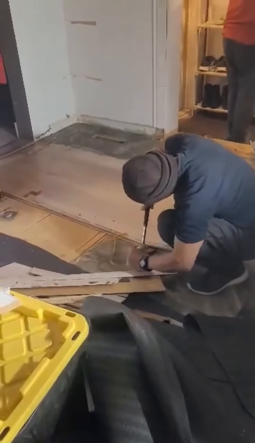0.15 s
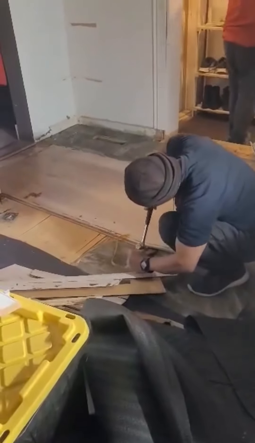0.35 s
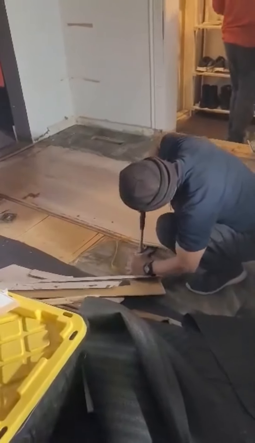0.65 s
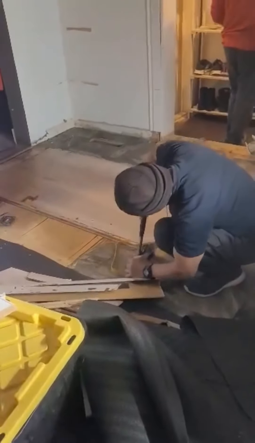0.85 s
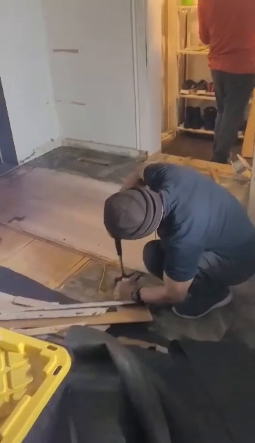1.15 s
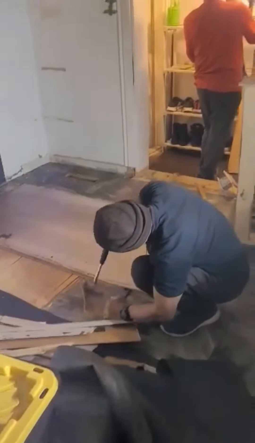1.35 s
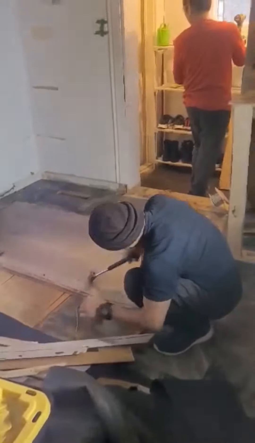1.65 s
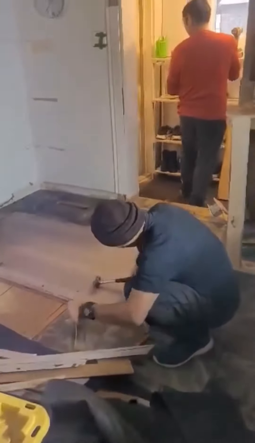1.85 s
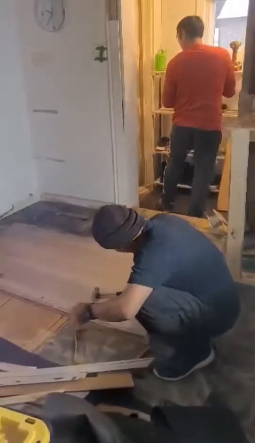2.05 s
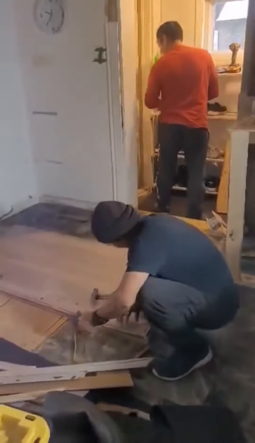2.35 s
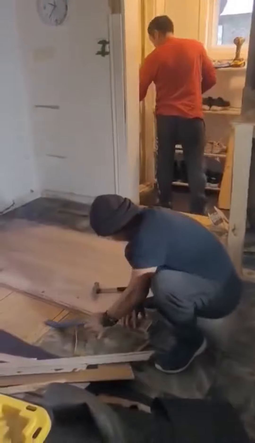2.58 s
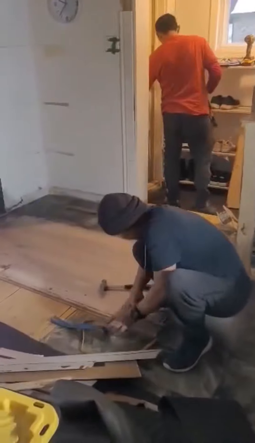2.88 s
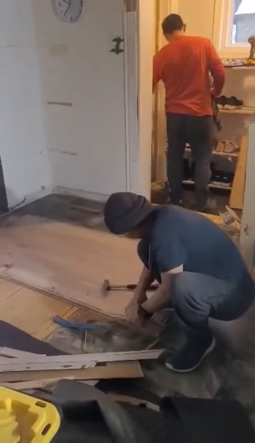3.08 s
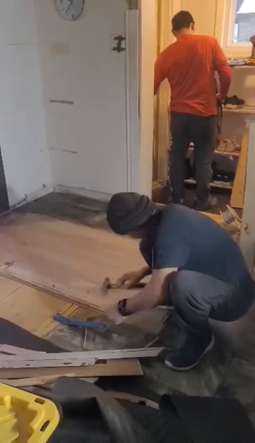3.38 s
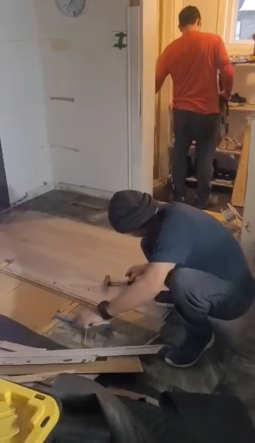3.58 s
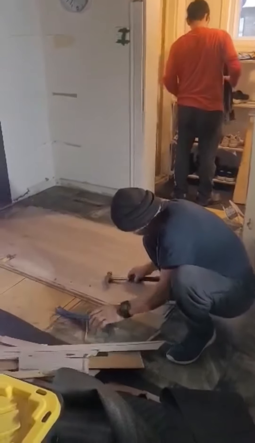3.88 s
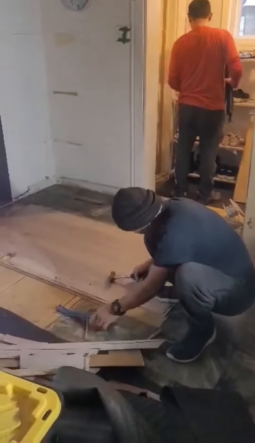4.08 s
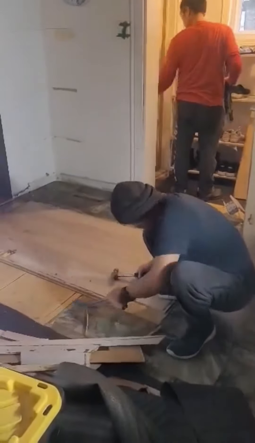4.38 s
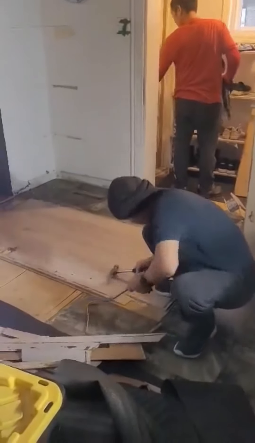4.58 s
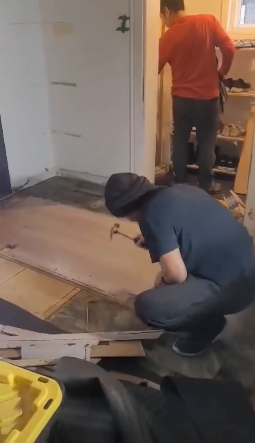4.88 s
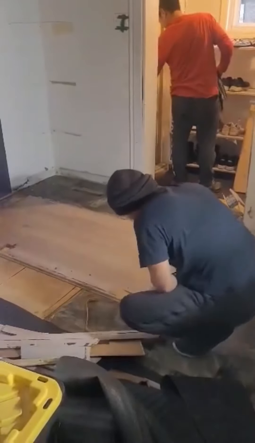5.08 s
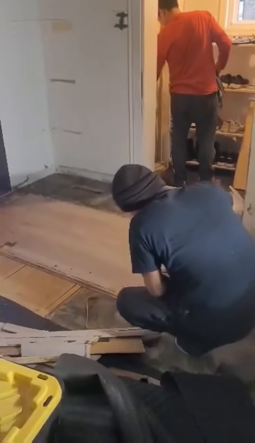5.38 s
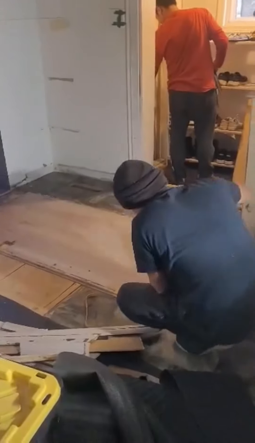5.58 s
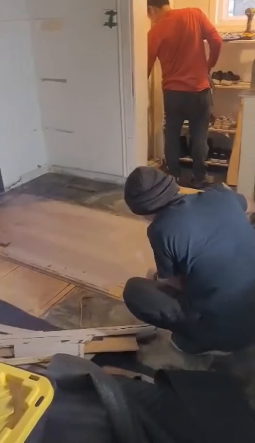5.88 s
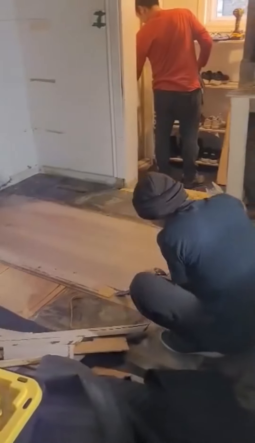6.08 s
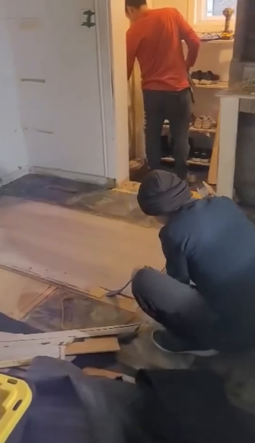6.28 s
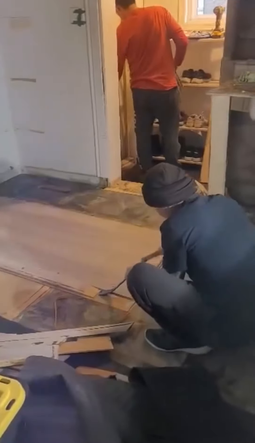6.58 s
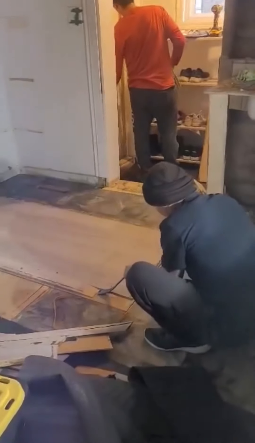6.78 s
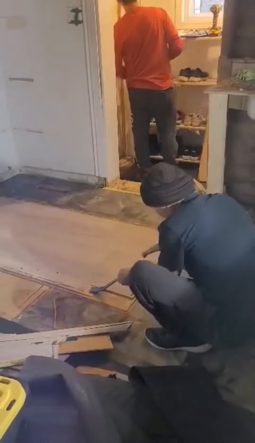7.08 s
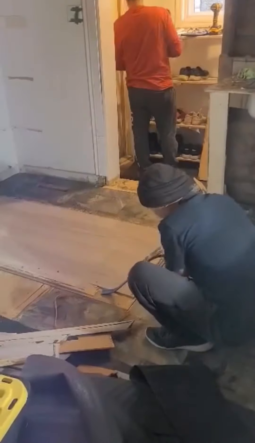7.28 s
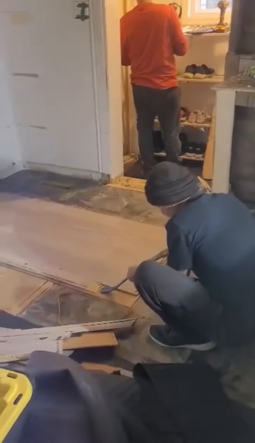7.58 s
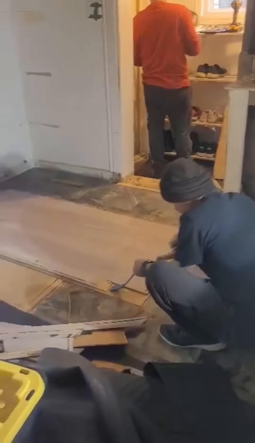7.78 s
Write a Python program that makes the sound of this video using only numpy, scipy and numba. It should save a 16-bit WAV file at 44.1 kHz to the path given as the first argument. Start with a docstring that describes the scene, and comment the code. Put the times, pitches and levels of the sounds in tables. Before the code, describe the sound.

A hammer knocks a steel pry bar on a wooden floor, with sharp clacks, dull thuds and gritty scrapes in a small room.

```python
"""A hammer knocks a steel pry bar on a half-stripped wooden floor, while the crouching worker drags tools
and boards about and shifts their weight. Hard contacts clack, a few blows ring the bar, soft ones thud
through the boards; grit scrapes under whatever slides, and one rub squeaks. A small bare room answers
over a faint house hush, heard by a phone whose right port is muffled in the treble."""
import sys
import numpy as np
from scipy import signal
from scipy.fft import rfft, irfft
from scipy.io import wavfile
from scipy.ndimage import uniform_filter1d
from numba import njit

SR = 44100
rng = np.random.default_rng(int(sys.argv[2]) if len(sys.argv) > 2 else 0)


def dump_mix(stems):
    """Bounce the given channels to the path in sys.argv[1] as a 16-bit WAV at rate SR."""
    frames = np.atleast_2d(stems).T  # one column per channel
    limited = np.clip(frames, -1, 1)  # hard clip at full scale
    pcm = np.round(limited * 32767).astype(np.int16)
    wavfile.write(sys.argv[1], SR, pcm)


N = 350154

# floorboard modes: (frequency [Hz], level [dB], t60 [s])
BOARD_MODES = [(172.3, -2.5, 0.13), (236, -11.5, 0.083), (272.5, -6.5, 0.1), (346.6, 11, 0.026),
               (407, 2, 0.021), (469.2, -0.5, 0.037), (605, -6.5, 0.21)]


def undb(db):
    return 10 ** (np.asarray(db) / 20)


def unit(x):
    return x / np.sqrt(np.mean(x ** 2))


def peak(x):
    return x / np.max(np.abs(x))


def band(x, lo_hz, hi_hz):
    """Band-pass between two edges."""
    sos = signal.butter(2, [lo_hz, min(hi_hz, .45 * SR)], "bandpass", fs=SR, output="sos")
    return signal.sosfilt(sos, x)


def colour(x, curve):
    """EQ through (frequency [Hz], gain [dB]) points."""
    hz, db = np.transpose(curve)
    f = np.maximum(np.fft.rfftfreq(N, 1 / SR), 1)
    return irfft(rfft(x) * undb(np.interp(np.log(f), np.log(hz), db)), N)


def stereo_noise(size, crossover_hz=520, bass_width=.16):
    """Two noises, nearly mono in the bass and wide in the treble."""
    mid, side, deep = rng.standard_normal((3, size))
    low = signal.butter(2, crossover_hz, fs=SR, output="sos")
    high = signal.butter(2, crossover_hz, "highpass", fs=SR, output="sos")
    return np.array([signal.sosfilt(low, mid + bass_width * deep) - signal.sosfilt(high, mid),
                     signal.sosfilt(low, mid - bass_width * deep) + signal.sosfilt(high, side)])


def wander(rate_hz):
    """Glides between random values; spread near 1."""
    hold = int(SR / rate_hz)
    return uniform_filter1d(np.repeat(rng.standard_normal(N // hold + 1), hold), hold)[:N]


def add(out, x, start_s):
    """Mixes x in from start_s."""
    i = round(start_s * SR)
    out[i:i + len(x)] += x[:N - i]


def ring(modes, t, scatter_db, detune):
    """Response of a struck body; every blow lands elsewhere, so mode strengths scatter."""
    hz, db, t60 = np.transpose(modes)[:, :, None]
    level_draw, pitch_draw = rng.standard_normal((2, len(modes), 1))
    decay = np.exp(-np.log(1000) * t / np.maximum(t60, .01))
    partials = np.sin(2 * np.pi * hz * (1 + detune * pitch_draw) * t)
    return np.sum(undb(db + scatter_db * level_draw) * decay * partials, axis=0)


def house_hush():
    """Room tone: low, wavering noise and a faint hum, growing quieter toward the end."""
    # hush spectrum: (frequency [Hz], relative level [dB])
    spectrum = [(18, -21), (30, -21.5), (141, -8), (165, -8), (362, -6.5), (455, -11), (795, -17),
                (974, -17.5), (1930, -25), (2250, -30.5), (13000, -47.5)]
    # narrow hum in the house: (centre [Hz], width [Hz], level [dB])
    hum_bands = [(773, 52, -65)]
    # fade of hush and hum: (time [s], gain [dB])
    fade = [(0, 0), (6.2, -1.5), (7.94, -6.5)]
    noise = stereo_noise(N)
    hum = sum(undb(db) * unit(band(noise, hz - w / 2, hz + w / 2)) for hz, w, db in hum_bands)
    hush = undb(-52.5 + 2 * wander(29)) * unit(colour(noise, spectrum))
    fade_db = np.interp(np.arange(N) / SR, *np.transpose(fade))
    return undb(fade_db) * (hush + hum)


def room_tail(build_s=.002):
    """Diffuse answer of the bare room to one spot: builds quickly, loses treble first."""
    # reverb decay: (frequency [Hz], t60 [s])
    decay_times = [(60, 0.38), (500, 0.31), (2000, 0.2), (4000, 0.19), (12000, 0.17)]
    t = np.arange(int(.45 * SR)) / SR
    noise = stereo_noise(len(t))
    hz, t60 = np.transpose(decay_times)
    octaves = 50 * 2. ** np.arange(9)
    octave_t60 = np.interp(np.log(octaves), np.log(hz), t60)
    tail = np.zeros_like(noise)
    for f, decay_s in zip(octaves, octave_t60):
        octave = np.sqrt(f) * unit(band(noise, f / np.sqrt(2), f * np.sqrt(2)))
        tail += octave * np.exp(-np.log(1000) * t / decay_s)
    tail *= 1 - np.exp(-t / build_s)
    return tail / np.sqrt(np.sum(tail ** 2) / 2)


def room(x, tail_over_direct_db=3.2, spot_s=.3):
    """Direct sound plus a fresh tail each time the work moves to a new spot."""
    out, step = np.zeros((2, N)), int(spot_s * SR)
    for i in range(0, N, step):
        response = undb(tail_over_direct_db) * room_tail()
        right_lag = rng.integers(4, 20)  # samples
        response[[0, 1], [0, right_lag]] += 1  # direct sound at each port
        heard = signal.fftconvolve(x[None, i:i + step], response, axes=1)
        for channel in range(2):
            add(out[channel], heard[channel], i / SR)
    return out / np.sqrt(1 + undb(2 * tail_over_direct_db))


def squeak(start_s=3.71, length_s=.065, swell_s=.018, pitch_hz=1422):
    """Nearly regular stick-slip: a short stack of partials that grows purer as it goes."""
    # partials 1-4 at the onset: (relative level [dB])
    partials = [0, -2, -3, -5]
    t = np.arange(N) / SR - start_s
    phase = 2 * np.pi * np.cumsum(pitch_hz * (1 + .006 * wander(200))) / SR
    tilt_db = -270 * np.clip(t, 0, 1)  # per partial, steepening with time
    envelope = uniform_filter1d(np.clip(t / swell_s, 0, 1) * (t < length_s), size=400)
    tone = sum(undb(db + k * tilt_db) * np.sin((k + 1) * phase) for k, db in enumerate(partials))
    return undb(-29) * envelope * tone


def slide_envelope(swell_s, fade_s, start_db=-13, end_db=-17.5):
    """One slide swells, rounds over its crest, fades and stops."""
    t = np.arange(int((swell_s + fade_s) * SR)) / SR
    from_crest = np.interp(t, [0, swell_s, swell_s + fade_s], [-1, 0, 1])
    db = np.where(from_crest < 0, start_db, end_db) * np.abs(from_crest) ** 1.55
    return undb(db) * signal.windows.tukey(len(db), .1)


def grit_scrapes(clicks_per_s=2500):
    """Tools, shoes and boards slide over grit: uneven clicks become rasp, dust hiss and floor rumble."""
    # slides: (start [s], swell [s], fade [s], rasp level [dB], dust re rasp [dB], rumble re rasp [dB])
    slides = [(0.025, 0.018, 0.03, -46.5, -18, 9), (0.519, 0.0033, 0.26, -38, -12, 5.5),
              (0.703, 0.14, 0.2, -43.5, 2, 0.5), (1.03, .1, 0.08, -51, -5, 3.5),
              (1.268, 0.025, 0.39, -47.5, -1, 5), (1.698, .02, 0.22, -44, -13, 10),
              (2.091, 0.067, 0.12, -45.5, -15, 6), (2.382, 0.15, 0.17, -50, -6, 2),
              (2.729, 0.019, 0.22, -49, -7, 2.5), (3.02, 0.11, 0.13, -30, -11, 0.5),
              (3.24, 0.046, 0.12, -46, -8, -5.5), (3.7, .09, 0.0084, -38, -12, 0.5),
              (4.049, 0.014, 0.43, -57.5, -8.5, 7.5), (4.4, 0.18, 0.051, -54.5, -48, -33),
              (4.747, 0.025, 1, -56.5, -4.5, -34), (5.27, 0.1, 0.09, -36.5, -7, 4.5),
              (5.429, 0.0089, 0.12, -52.5, 4, -23), (5.588, 0.016, 0.11, -50, 8, 2),
              (5.852, .15, 0.11, -30, -6.5, 2.5), (6.82, 0.16, 0.026, -59, 6, -14),
              (7.498, 0.083, 0.026, -57, 2.5, 4), (7.73, 0.02, 0.041, -57.5, 1, -4)]
    # resonances of the dragged piece: (centre [Hz], width [Hz], gain [dB])
    resonances = [(750, 84, 4.5), (1520, 450, -1.5), (620, 100, 5)]
    clicks = (rng.random(N) < clicks_per_s / SR) * rng.standard_normal(N)
    clicks *= undb(2.5 * rng.exponential(size=N))  # a few coarse grains stand out
    grit = unit(clicks) + .4 * rng.standard_normal(N)
    grit *= undb(3.5 * wander(40))  # fits and starts
    body = sum(undb(db) * band(grit, hz - w / 2, hz + w / 2) for hz, w, db in resonances)
    rasp = unit(band(grit, 370, 5000) + body)
    dust = unit(band(grit, 4600, 14000))
    board_ring = ring(BOARD_MODES, np.arange(8000) / SR, scatter_db=0, detune=.01)
    boards = unit(band(signal.fftconvolve(grit, board_ring)[:N], 100, 1200))
    joists = undb(-10.5) * unit(band(grit, 37, 100))
    rumble = unit(boards + .55 * unit(band(grit, 180, 1500)) + joists)
    out = np.zeros(N)
    for start_s, swell_s, fade_s, db, dust_db, rumble_db in slides:
        gain = undb(db) * slide_envelope(swell_s, fade_s)
        span = slice(int(start_s * SR), int(start_s * SR) + len(gain))
        out[span] += gain * (rasp[span] + undb(dust_db) * dust[span] + undb(rumble_db) * rumble[span])
    return out


def board_thuds(push_s=.014):
    """A soft, uneven push rings the board modes near its pitch; the joists add a deep thump."""
    # soft blows and footfalls: (time [s], level [dB], pitch [Hz])
    blows = [(0.052, -27.5, 371), (0.574, -16, 196), (0.627, -23, 164), (0.932, -27.5, 134),
             (1.089, -24.5, 182), (1.194, -28.5, 236), (1.257, -28, 196), (1.336, -35, 180),
             (1.681, -2, 264), (1.73, -18.5, 158), (1.808, -16.5, 227), (2.072, -17, 242), (2.13, -17, 232),
             (2.473, -25.5, 400), (2.577, -20, 420), (2.723, -16, 308), (2.789, -18.5, 223),
             (2.833, -19, 350), (3.04, -28, 280), (3.19, -27.5, 285), (3.278, -29.5, 168),
             (3.811, -12.5, 450), (3.878, -16, 500), (4.002, -23, 423), (4.12, -31.5, 236),
             (4.314, -30.5, 440), (4.965, -24, 180), (5.596, -34, 146), (6.003, -6.5, 253),
             (6.05, -19, 239), (6.482, -9.5, 227), (6.932, -11.5, 216), (7.303, -33.5, 333),
             (7.571, -32, 238)]
    out, t = np.zeros(N), np.arange(int(.3 * SR)) / SR
    for start_s, db, hz in blows:
        push = rng.standard_normal(len(t)) * np.exp(-t / push_s)
        board_ring = ring(BOARD_MODES, t, scatter_db=.59, detune=.007)
        boards = signal.fftconvolve(band(push, hz / 2.16, hz * 1.224), board_ring)[:len(t)]
        joist_db = -18.5 - 3.5 * np.log2(hz / 200)  # low blows move the joists most
        joists = undb(joist_db) * peak(band(push, 64, 92))
        add(out, undb(db) * (peak(boards) + joists), start_s)
    return out


def tool_clacks(bounce_s=.014, bounce_db=-5.5, attack_share=.096):
    """Hard contacts of tool and wood bounce once: pitched snap, broad crack, woody knock, thin top."""
    # contacts: (time [s], level [dB], pitch [Hz], knock gain [dB], crack gain [dB], decay [s])
    contacts = [(0.057, -3.5, 3330, -29, 14.5, 0.0066), (0.064, -6.5, 3100, -12, -0.5, 0.006),
                (0.4873, -11.5, 2910, -8, 4.5, 0.013), (0.6164, -17, 1690, -5, -8, 0.02),
                (0.8038, -19, 1700, -12, -3.5, 0.0056), (0.841, -23, 6530, -16, 0, 0.0076),
                (0.924, -20.5, 9800, -14, -8, 0.0079), (0.947, -28, 5360, -21, 4, 0.0068),
                (1.179, -16.5, 2230, -15, -6, 0.0067), (1.199, -15, 1640, -11, -5, 0.0025),
                (1.4193, -22, 2620, -25, 4.5, 0.0049), (1.6806, -9.5, 1480, 4, 5, 0.0042),
                (1.801, -29, 1570, 4, 3, 0.013), (2.072, -19, 2190, -4, -11.5, 0.022),
                (2.465, -45, 1600, 15.5, 0, 0.064), (2.572, -30, 1850, 8.5, 2, 0.016),
                (2.718, -40.5, 1520, 6.5, -20, 0.0073), (2.756, -36, 6200, -12, -1, 0.0019),
                (2.828, -36.5, 1650, 13.5, -2, 0.0044), (3.787, -5.5, 2020, -11.5, -4, 0.026),
                (3.799, -7.5, 2350, -10, 5.5, 0.019), (3.875, -7.5, 1910, -9.5, 3, 0.012),
                (3.935, -10, 1830, -6.5, 0, 0.013), (4.311, -38, 1960, 4, 7, 0.0028),
                (4.9633, -32.5, 1840, -3.5, -3.5, 0.012), (5.588, -32, 1685, -8, 8, 0.036),
                (6.002, -26, 2010, 14.5, -11, 0.0074), (6.4788, -2.5, 2140, -13, 6.5, 0.026),
                (6.927, -4, 4670, -16, 11, 0.031), (7.297, -43.5, 2145, 3.5, 2, 0.026),
                (7.568, -43, 7330, -13, 8, 0.0077)]
    out, t = np.zeros(N), np.arange(int(.3 * SR)) / SR
    for start_s, db, hz, knock_db, crack_db, decay_s in contacts:
        attack = np.minimum(t / max(attack_share * decay_s, .001), 1)
        envelope = attack * np.exp(-t / max(decay_s, .002))
        envelope += undb(bounce_db) * np.interp(t - bounce_s, t, envelope)
        contact, wood, crack = rng.standard_normal((3, len(t))) * envelope
        snap = peak(band(contact, hz / 1.25, hz * 1.25))
        for _ in range(3):  # steep band edges
            crack = band(crack, 1100, 6400)
        bite = peak(snap + undb(crack_db) * peak(crack))
        knock = undb(knock_db) * peak(band(wood, 500, 1500))
        top = undb(-23.5) * peak(band(contact, 6500, 19000))
        add(out, undb(db) * (bite + knock + top), start_s)
    return out


def pry_bar(rattle_s=.023, tick_db=14):
    """The hammered steel bar, damped by hand and wood, rattles on the board and rings briefly."""
    # modes of the bar: (frequency [Hz], level [dB], t60 [s])
    steel_modes = [(3460, -2, .11), (4200, -2, .1), (4545, 0, .13), (4875, -3, .1), (5575, -2, .11),
                   (6455, -7, .11), (7130, -6, .12), (7915, -5, .09), (9140, -7, .08), (9520, -7, .08),
                   (10480, -5, .08), (11300, -6, .07), (12100, -9, .08)]
    # hammer blows: (time [s], ring level [dB], bright spit re ring [dB])
    blows = [(0.056, -15.5, -23), (0.486, -22.5, -19.5), (6.481, -11.5, 1), (6.929, -6, -6)]
    out, t = np.zeros(N), np.arange(int(.3 * SR)) / SR
    for start_s, db, spit_db in blows:
        rattle = rng.standard_normal(len(t)) * np.exp(-t / rattle_s)
        rattle[0] += undb(tick_db)  # first contact of steel on steel
        spit = undb(spit_db) * peak(band(rattle, 11500, 12000))
        steel_ring = ring(steel_modes, t, scatter_db=2, detune=.003)
        steel = peak(signal.fftconvolve(rattle, steel_ring)[:len(t)])
        add(out, undb(db) * (steel + spit), start_s)
    return out


def scene():
    """All the floor work in the room, over the hush, at the phone's two ports."""
    # microphone presence lift on the work: (frequency [Hz], gain [dB])
    presence = [(3000, 1.5), (4800, 4), (8500, 2.5), (10000, 2), (12500, -3)]
    # muffled right port: (frequency [Hz], gain [dB])
    muffle = [(200, 0), (360, 2), (700, .5), (2200, 0), (4000, -4.5), (6000, -9), (8500, -21), (10500, -20),
              (13000, -11)]
    work = tool_clacks() + pry_bar() + board_thuds() + grit_scrapes() + squeak()
    left, right = colour(room(work), presence) + house_hush()
    return np.array([left, colour(right, muffle)])


@njit
def follow(x, release):
    """Envelope that jumps up and slides down."""
    level, out = 0., np.empty(len(x))
    for i in range(len(x)):
        level = max(x[i], level * release)
        out[i] = level
    return out


def record(dry):
    """The phone's limiter holds loud blows down, then a steep low-pass cuts the top."""
    threshold_db, ratio, release_s, top_hz = -9, 1.7, .015, 12950
    level = uniform_filter1d(np.max(np.abs(dry), axis=0), 64)
    envelope = follow(level, np.exp(-1 / (release_s * SR)))
    gain = np.minimum(1, undb(threshold_db) / (envelope + 1e-9)) ** (1 - 1 / ratio)
    return signal.sosfilt(signal.ellip(10, .2, 70, top_hz, fs=SR, output="sos"), dry * gain)


dry = scene()
out = record(dry)
dump_mix(out)
```